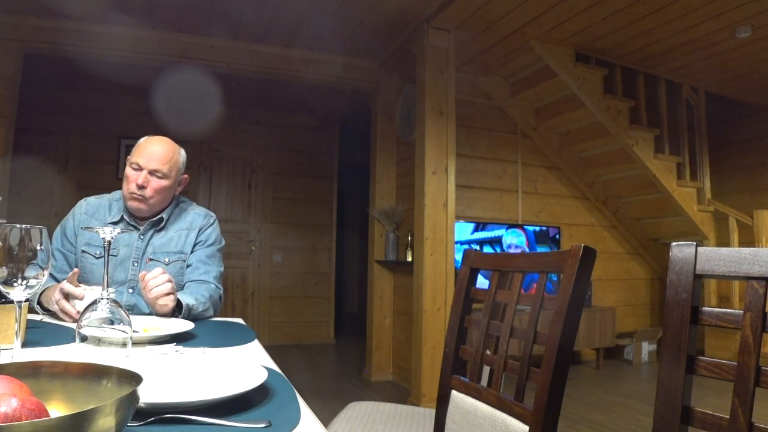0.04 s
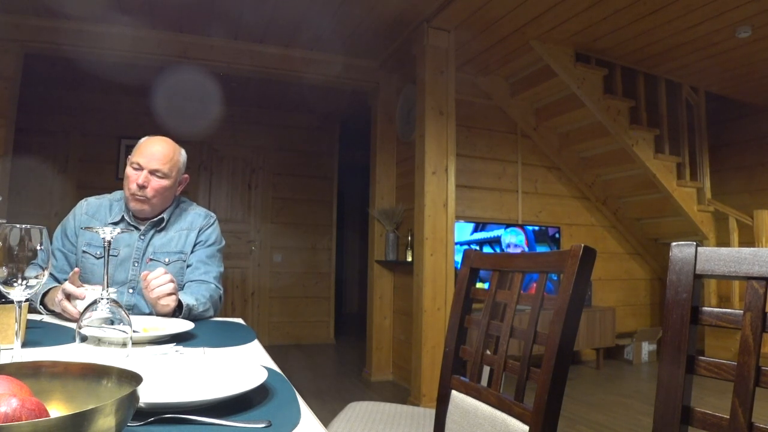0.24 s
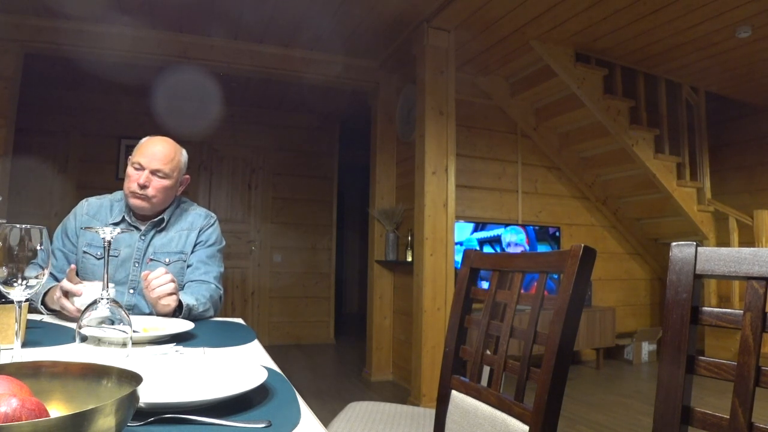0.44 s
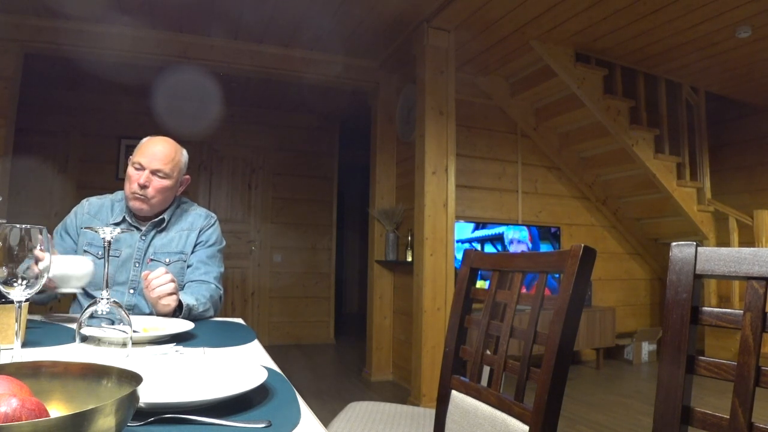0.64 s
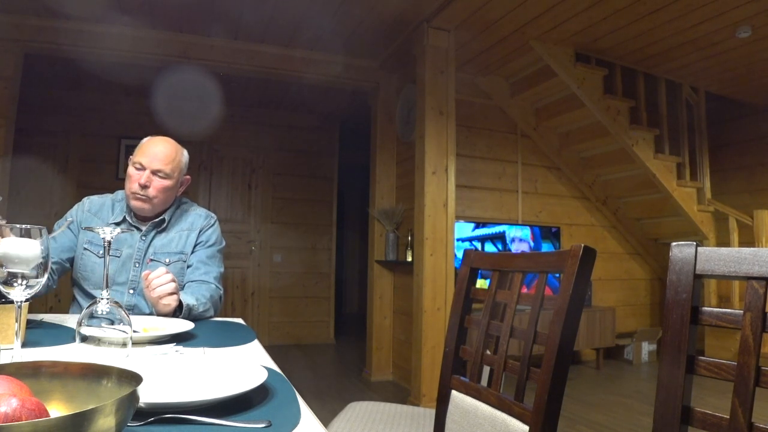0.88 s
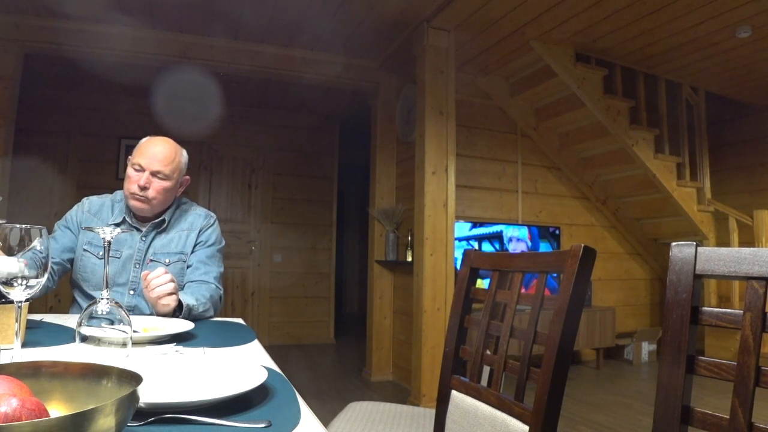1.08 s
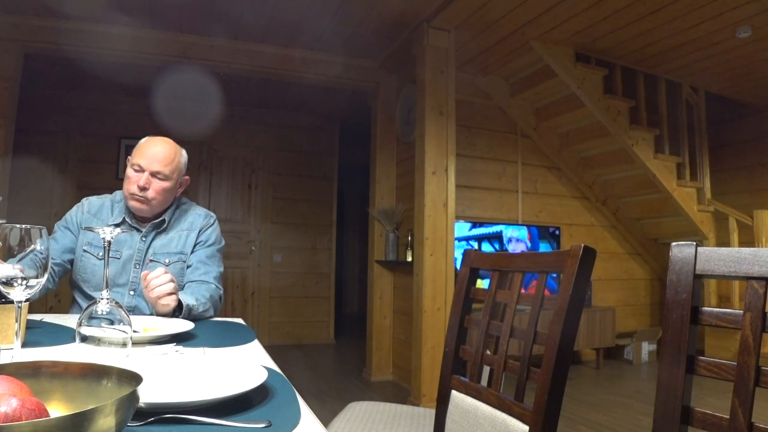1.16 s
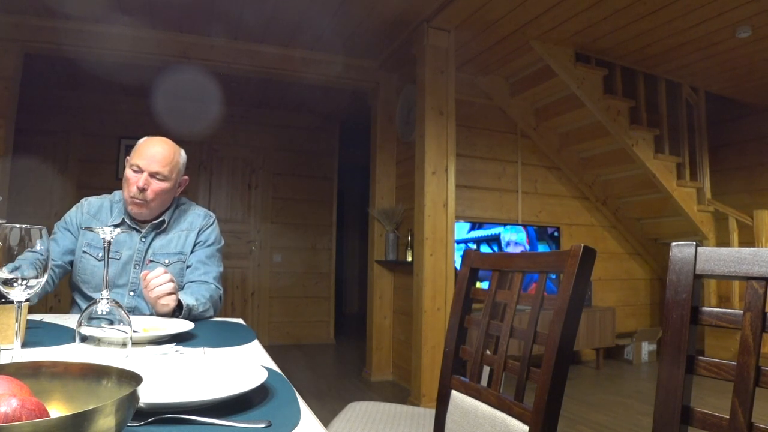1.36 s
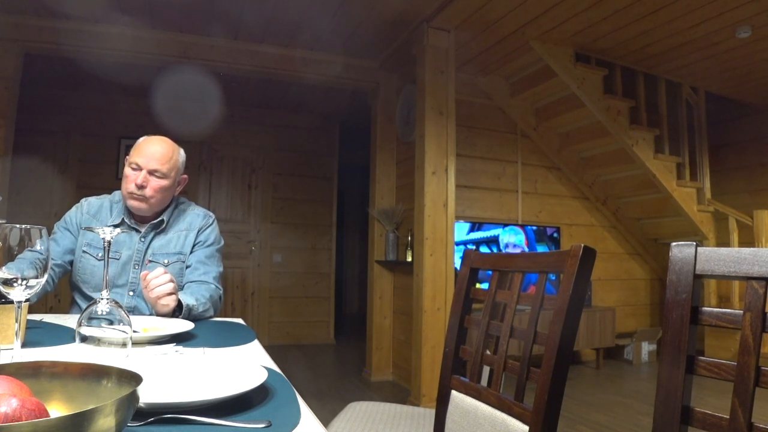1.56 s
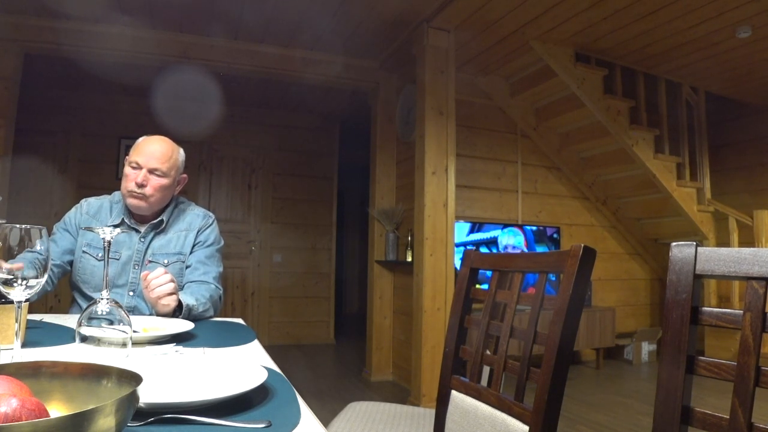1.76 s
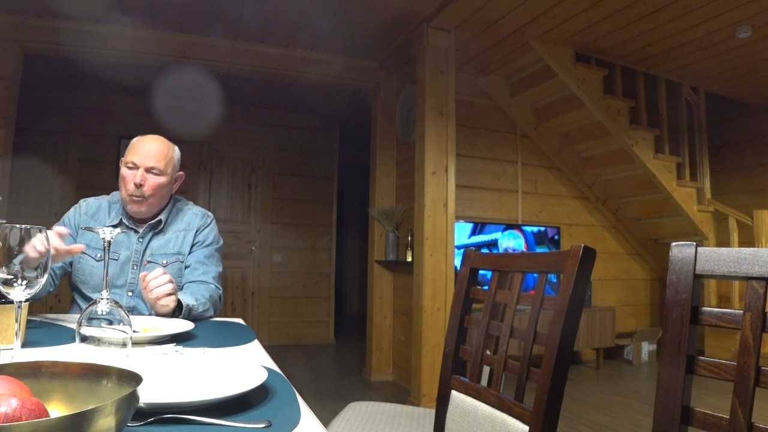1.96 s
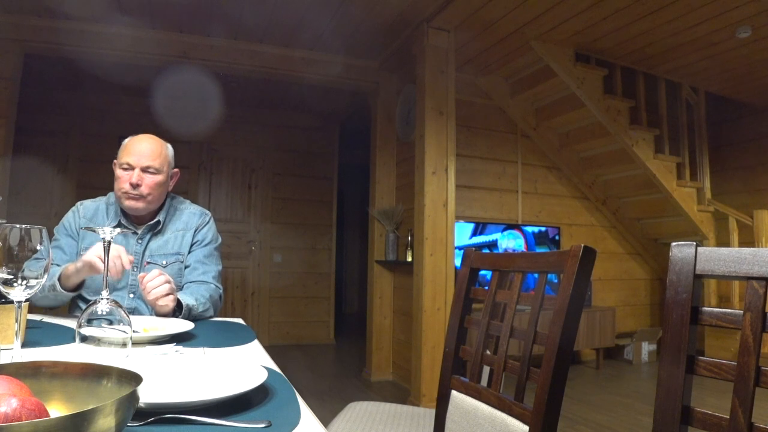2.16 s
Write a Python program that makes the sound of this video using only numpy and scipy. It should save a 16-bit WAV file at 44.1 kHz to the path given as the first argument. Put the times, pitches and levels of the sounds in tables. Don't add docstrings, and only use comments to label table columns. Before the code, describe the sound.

Wooden table thuds in a quiet timber room, heard close in stereo. A moderate knock at 0.05 s brings tiny glass ticks and a faint aftershock near 0.18 s. Quiet room noise follows until a much harder double bump at 1.42 s. A plate chatters until about 1.55 s, a stemmed glass rocks with rapid fading clinks from 1.59 to 1.74 s, then faint clinks at 1.95 and 2.19 s.

```python
import sys
import numpy as np
from scipy import signal
from scipy.fft import rfft, irfft, next_fast_len
from scipy.io import wavfile
from scipy.ndimage import uniform_filter1d

SR = 44100
rng = np.random.default_rng(int(sys.argv[2]) if len(sys.argv) > 2 else 0)


def volts_from_db(level):
    exponent = np.asarray(level, float) / 20
    return 10 ** exponent


def file_out(sig):
    cols = np.atleast_2d(sig).T
    lim = np.clip(cols, -1, 1)
    pcm = np.round(lim * 32767).astype(np.int16)
    wavfile.write(sys.argv[1], SR, pcm)


N = 98254

# t/s, level/dB, thud/dB, modes above 800 Hz/dB, modes of 270-800 Hz/dB
BUMPS = [
    (0.0496, -24.5, -9.5, -6.5, 6),
    (0.179, -41, -15, -22, -6),
    (1.4249, -12, -3, -1, -5.5),
    (1.447, -15.5, -4, -6, 2.5),
    (1.622, -37.5, -1, 6.5, 8),
    (1.97, -47, -15, -25, -27),
]
BOARD_HZ = [140, 193, 255, 287, 360, 435, 490, 565, 625, 765, 870, 1150, 1620, 2550]
# level/dB, t60/s
BOARD_MODES = [(-8, 0.47), (-6.5, .3), (0.5, 0.35), (3.5, 0.1), (4.5, 0.054), (-2.5, 0.05), (-18, 0.16),
               (6, 0.033), (-1, 0.09), (-6, 0.03), (-4, 0.24), (-4.5, 0.041), (-4.5, 0.081), (-2, 0.018)]
# f/Hz, density/dB
THUD_SPECTRUM = [(24, -59), (40, -56.5), (346, 4.5), (478, -2), (980, -7), (1650, -8), (1820, -12.5),
                 (2580, -11.5), (15000, -62.5)]
# f/Hz, left over right/dB
TABLE_BALANCE = [(400, 0), (1200, 3), (8000, 2)]
GLASS_HZ = [1050, 2356, 3545, 4506, 5835, 6005, 7518, 8660, 9680, 10020, 10250, 11150, 12580, 14150]
# level/dB, t60/s, left over right/dB
GLASS_MODES = [(-5, .07, 3), (0, .25, 3), (-13, .08, 2), (-12, .22, 2), (-3, .2, 2), (0, .22, 3),
               (-6, .15, 2), (-22, .15, 2), (-9, .12, 2), (-8, .11, 2), (-7, .09, 2), (-6, .12, 2),
               (-14, .1, 2), (-13, .09, 2)]
# t/s,
# level/dB, low note/dB, foot knock/dB, ring length factor
CLINKS = [
    (0.0683, -44.5, -20, -5, 0.39),
    (0.085, -41.5, -10, 2.5, 0.66),
    (0.175, -49, -4, 10, 0.17),
    (1.549, -35, 0, -12, 0.25),
    (1.9503, -42.5, -6, 3, 1.33),
    (1.973, -44, -31, 1.5, 1.07),
    (1.988, -61, 15, 5, 0.39),
    (2.187, -45.5, -16.5, 0.5, 1.6),
    (2.199, -45, -16, -1, 0.56),
          (1.589, -36, -12, -19, .8), (1.612, -42, -10, -15, .8), (1.636, -39, -3, -12, .9),
         (1.648, -41, 9, -10, .9), (1.657, -38, -3, -17, .9), (1.668, -41, 9, -12, .9),
         (1.686, -42, 6, -12, .9), (1.702, -42, 3, -14, .8), (1.716, -45, 1.5, -12, .8),
         (1.737, -46, -3, -15, .9)]
# f/Hz, density/dB
TICK_SPECTRUM = [(400, -79), (900, 2.5), (3000, -1), (6500, 6.5), (8800, -11), (10500, -25), (14300, -4.5),
                 (15500, -30)]
PLATE_HZ = [2261, 2320, 2961, 3666, 4853, 5620, 6336, 7004, 7876, 8597, 9884, 10930, 11600, 13000]
# level/dB, t60/s
PLATE_MODES = [(-30, 0.13), (0.5, 0.057), (-3.5, 0.17), (-9, 0.19), (-8, 0.064), (-6.5, 0.027), (-31, 0.18),
               (-13, 0.067), (-3.5, 0.13), (-26, 0.13), (-7.5, 0.2), (-9, 0.13), (-20, 0.099), (-35, .06)]
# t/s, level/dB
RATTLE_LEVEL = [(1.428, -47.5), (1.44, -47), (1.455, -31.5), (1.49, -33), (1.515, -40.5), (1.535, -51.5),
                (1.57, -43)]
# f/Hz, density/dB
GRIT_SPECTRUM = [(300, 9.5), (900, -25), (2000, -13), (5000, 0.5), (9000, 0), (12500, -5), (14000, -33),
                 (16000, -34)]
# f/Hz, t60/s
ROOM_T60 = [(100, 0.77), (300, 0.38), (2000, 0.24), (6000, 0.29), (14000, 0.23)]
# f/Hz, correlation
ROOM_ALIKE = [(200, .998), (500, .95), (1500, .75), (8000, .65), (14000, .35)]
# f/Hz, density/dB
AIR_SPECTRUM = [(12, -17), (20, 0), (198, -17.5), (446, -17), (558, -20), (1060, -23), (1760, -27),
                (3440, -31.5), (16000, -46.5)]
# f/Hz, width/Hz, level/dB
AIR_HUMPS = [(455, 32, 6.5), (1324, 302, 7.5), (4600, 240, 4), (12300, 250, 7)]
# t/s, level/dB
AIR_LEVEL = [(0, -51.5), (.4, -51), (.9, -53), (1.4, -54), (2.23, -52)]
# f/Hz, correlation
AIR_ALIKE = [(60, 0.95), (240, 0.62), (950, -0.54), (3770, 0.032), (15000, 0.61)]


def table():
    out, t = np.zeros((2, N)), np.arange(SR // 2) / SR
    for s, db, thud_db, bright_db, body_db in BUMPS:
        ring = np.zeros(len(t))
        for k, (hz, (level, t60)) in enumerate(zip(BOARD_HZ, BOARD_MODES)):
            mode_db = level + rng.normal(0, 1.5) + bright_db * (hz > 800) + body_db * (270 < hz < 800)
            sign = (-1) ** (k // 3)
            ring += sign * volts_from_db(mode_db - 60 * t / t60) * np.sin(2 * np.pi * hz * t)
        colour = lambda hz: volts_from_db(along(THUD_SPECTRUM, hz) + bright_db * (hz > 1000))
        noise = unit(filtered(rng.standard_normal(len(t)), colour))
        push = np.exp(-t / 0.076)
        thud = noise * volts_from_db(thud_db) * (push + volts_from_db(0.5 - 60 * t / 0.12))
        onset = 1 - np.exp(-t / 0.0016)
        hit = np.pad(volts_from_db(db - 4.5) * (ring + thud) * onset, (0, SR // 3))
        hit = filtered(hit, lambda hz: sides(along(TABLE_BALANCE, hz)))
        add(out, s, hit + volts_from_db(-6) * room(hit))
    return out


def glass():
    split, twin_db = 0.01085, -8
    rim_db = 15
    tick_db, tick_t60, tick_near_db, room_db = 8.5, 0.0053, -20, 6
    out, t = np.zeros((2, N)), np.arange(SR // 2) / SR
    hz = np.array(GLASS_HZ)[:, None]
    level, t60, pan = np.transpose(GLASS_MODES)[..., None]
    foot, low, rim = hz == GLASS_HZ[0], hz == GLASS_HZ[1], hz == GLASS_HZ[3]
    upper = hz > GLASS_HZ[5]
    twin_hz = hz * (1 + split * rng.uniform(-1.06, 1, hz.shape))
    wave = np.sin(2 * np.pi * hz * t) + volts_from_db(twin_db) * np.sin(2 * np.pi * twin_hz * t)
    for s, db, low_db, knock_db, length in CLINKS:
        mode_db = level + low_db * low + knock_db * foot - (knock_db + rim_db) * rim
        mode_db = mode_db - 0.35 * (knock_db + rim_db / 3) * upper
        size = volts_from_db(mode_db + rng.normal(0, 3, hz.shape))
        decay = volts_from_db(-60 * t / (t60 * length))
        ring = (sides(pan) * size * decay * wave).sum(1)
        noise = filtered(rng.standard_normal((2, len(t))), lambda f: volts_from_db(along(TICK_SPECTRUM, f)))
        tick = unit(noise) * volts_from_db(tick_db - 60 * t / tick_t60)
        reflected = room(ring + tick[0])
        add(out, s, volts_from_db(db) * (ring + volts_from_db(tick_near_db) * tick + volts_from_db(room_db) * reflected))
    return out


def plate():
    drive = contacts() * curve(RATTLE_LEVEL)

    def resonances(f):
        response = 0
        for hz, (db, t60) in zip(PLATE_HZ, PLATE_MODES):
            balance = sides(rng.normal(3.5, 2.4))[:, None]
            response = response + volts_from_db(db) * balance * mode(f, hz, t60)
        return response

    rattle = filtered(drive, resonances) + volts_from_db(5.5) * grit(drive)
    return rattle + volts_from_db(1.5) * room(rattle)


def contacts():
    per_s, size_db = 2500, 2.5
    chance, sign, size = rng.random((3, N))
    struck = chance < per_s / SR
    return unit(struck * np.sign(sign - 0.5) * volts_from_db(-size_db * np.log(size + 0.00041)))


def grit(drive):
    t = np.arange(SR // 20) / SR
    puff = rng.standard_normal((2, len(t))) * volts_from_db(-60 * t / 0.0067)
    puff = paired(puff, [(1000, 0.96), (12000, 0.29)])
    puff = filtered(puff, lambda hz: volts_from_db(along(GRIT_SPECTRUM, hz)))
    return signal.fftconvolve(drive[None], puff / np.linalg.norm(puff[0]), axes=1)[:, :N]


def room(x):
    hz, t, z = signal.stft(rng.standard_normal((2, SR // 2)), SR, nperseg=256)
    decay = volts_from_db(-60 * t / along(ROOM_T60, hz)[:, None])
    tail = signal.istft(z * decay, SR, nperseg=256)[1]
    tail = filtered(paired(tail, ROOM_ALIKE), lambda f: sides(along(TABLE_BALANCE, f)))
    late = np.pad(x.mean(0), (130, 0))[None]
    return signal.fftconvolve(late, tail / np.linalg.norm(tail[0]), axes=1)[:, :x.shape[1]]


def air():
    z = signal.stft(rng.standard_normal((2, N)), nperseg=512)[2]
    field = uniform_filter1d(rng.standard_normal(z.shape[1:]), 5, 0)
    field = uniform_filter1d(field, 12, 1)
    noise = signal.istft(z * volts_from_db(1.6 * unit(field)), nperseg=512)[1][:, :N]

    def colour(f):
        humps = sum(db * np.exp(-((f - hz) / width) ** 2) for hz, width, db in AIR_HUMPS)
        return volts_from_db(along(AIR_SPECTRUM, f) + humps)

    return unit(paired(filtered(noise, colour), AIR_ALIKE)) * curve(AIR_LEVEL)


def mode(f, hz, t60):
    w = np.log(1000) / (np.pi * abs(t60))
    gain = np.sqrt(SR / (np.pi * w))
    return gain * 1j * f * w / (hz * hz - f * f + 1j * f * w)


def paired(x, alike):
    def mid_side(hz):
        angle = np.arccos(np.clip(along(alike, hz), -1, 1)) / 2
        return np.array([np.cos(angle), np.sin(angle)])

    mid, side = filtered(x, mid_side)
    return np.array([mid + side, mid - side])


def sides(db):
    return volts_from_db(np.array([db / 2, -db / 2]))


def filtered(x, response):
    m = next_fast_len(x.shape[-1] + SR)
    return irfft(rfft(x, m) * response(np.fft.rfftfreq(m, 1 / SR)), m)[..., :x.shape[-1]]


def along(points, hz):
    f, v = np.transpose(points)
    return np.interp(np.log(hz + 1), np.log(f + 1), v)


def curve(rows):
    s, db = np.transpose(rows)
    return volts_from_db(np.interp(np.arange(N) / SR, s, db, left=-200, right=-200))


def unit(x):
    return x / np.sqrt(np.mean(x ** 2) + 1e-20)


def add(out, s, x):
    part = out[:, round(s * SR):round(s * SR) + x.shape[1]]
    part += x[:, :part.shape[1]]


def scene():
    return table() + glass() + plate() + air()


def roll_off(x):
    return signal.sosfilt(signal.butter(12, 16510, fs=SR, output="sos"), x)


def record(dry):
    mix = filtered(dry, lambda hz: hz < 15950)
    return roll_off(mix)


dry = scene()
out = record(dry)
file_out(out)
```